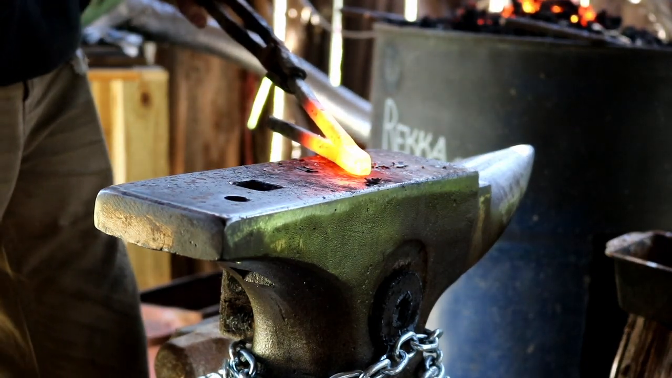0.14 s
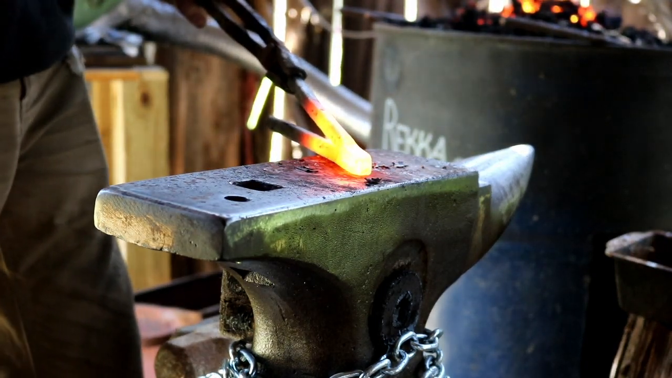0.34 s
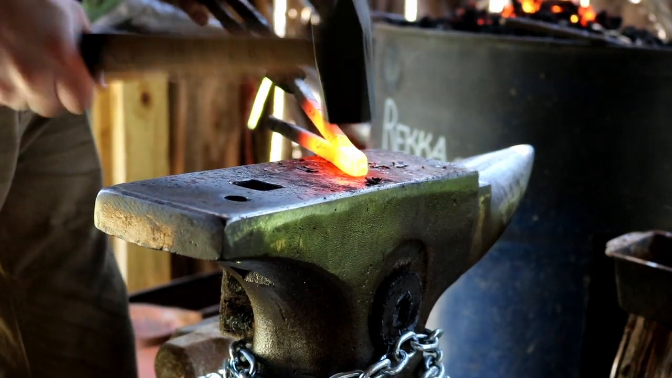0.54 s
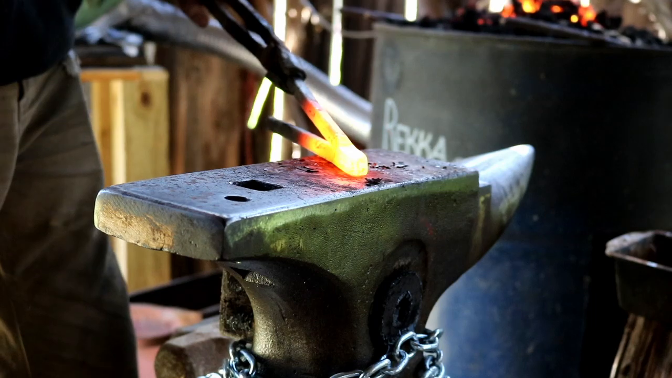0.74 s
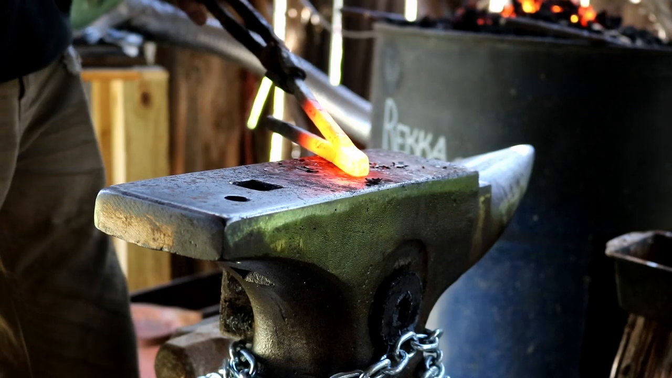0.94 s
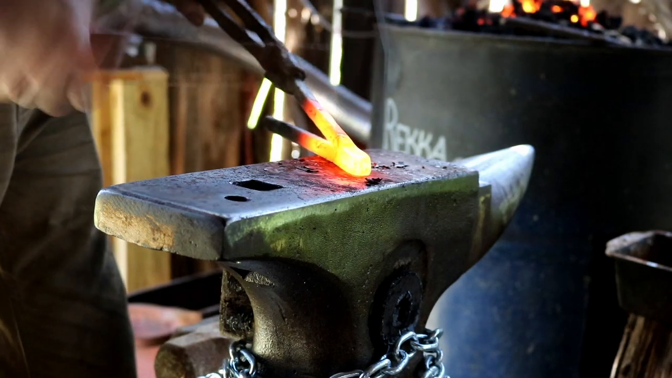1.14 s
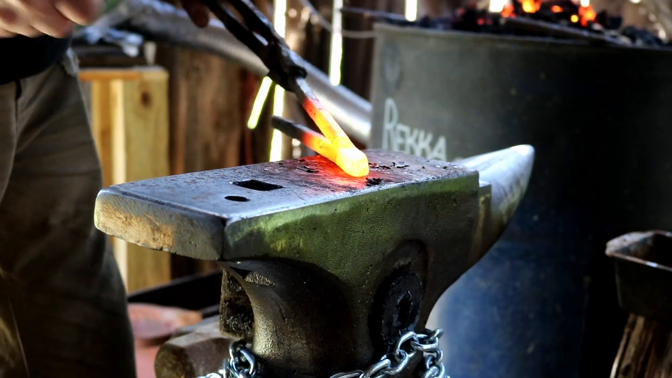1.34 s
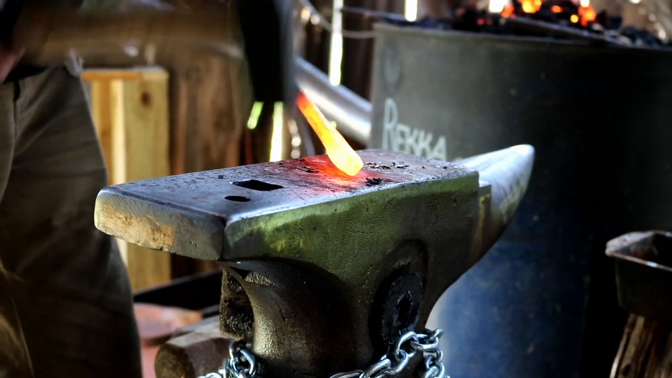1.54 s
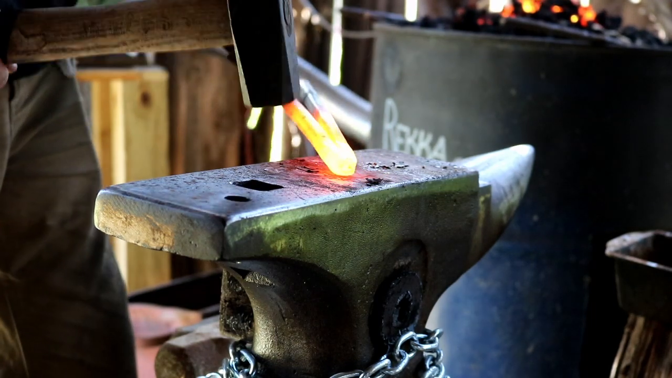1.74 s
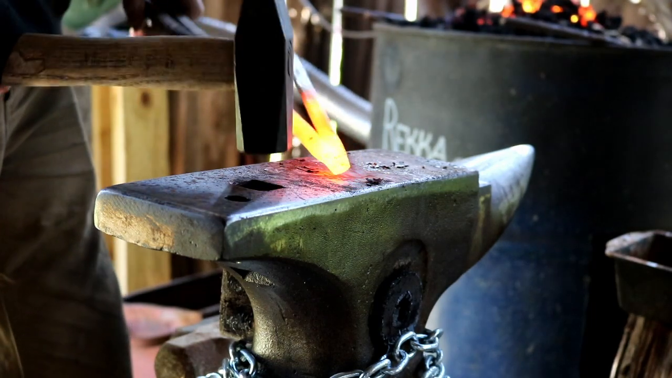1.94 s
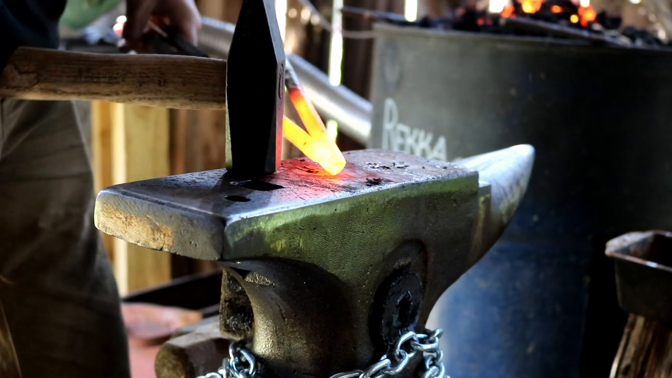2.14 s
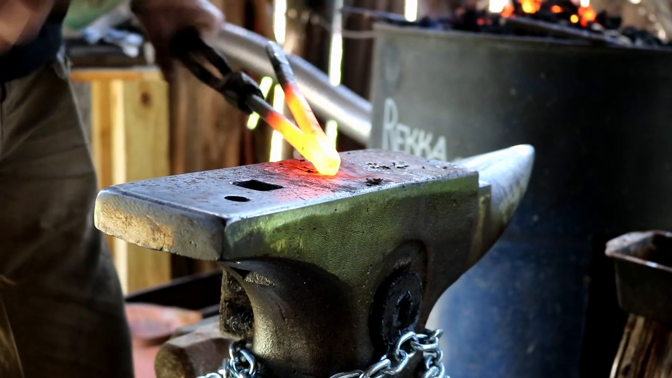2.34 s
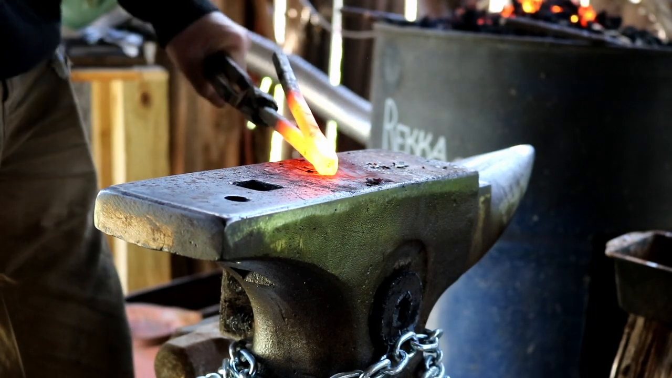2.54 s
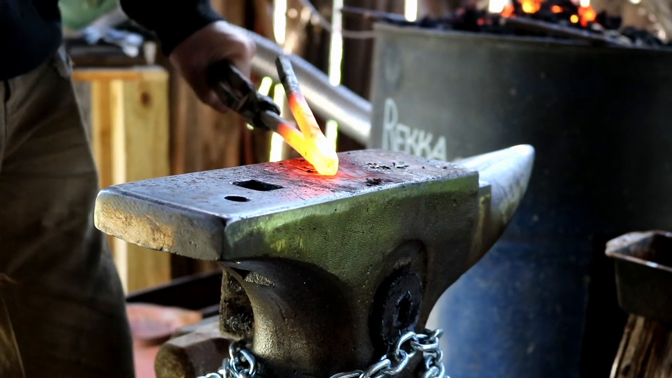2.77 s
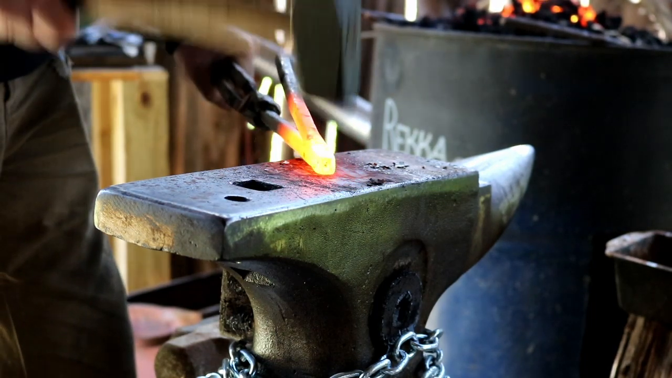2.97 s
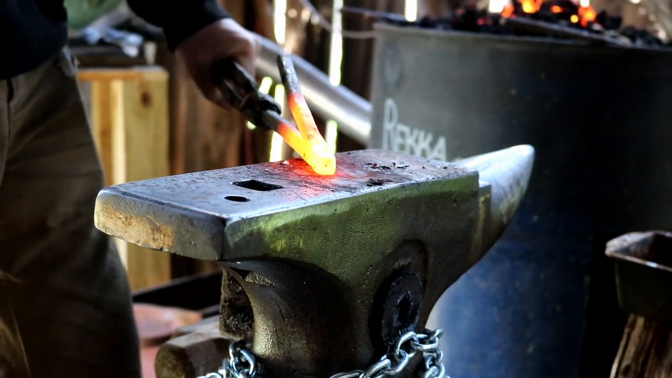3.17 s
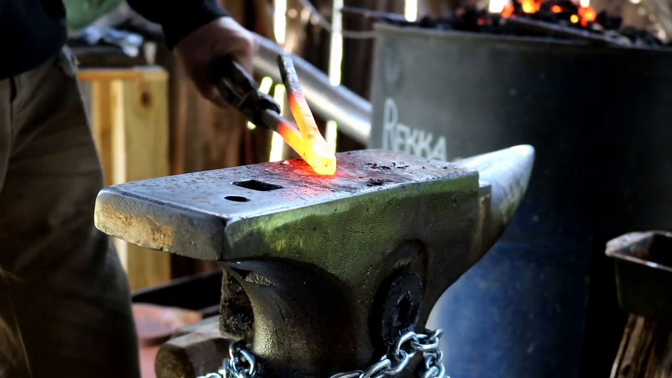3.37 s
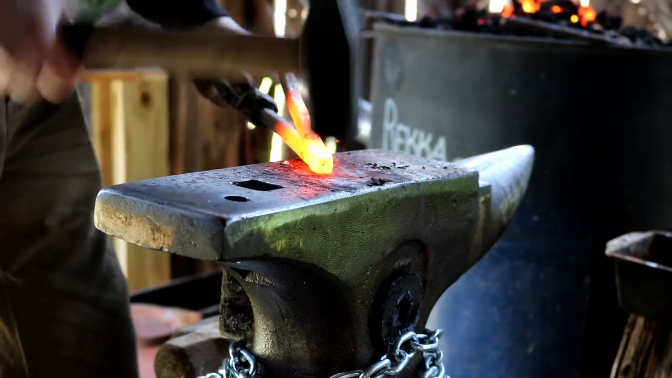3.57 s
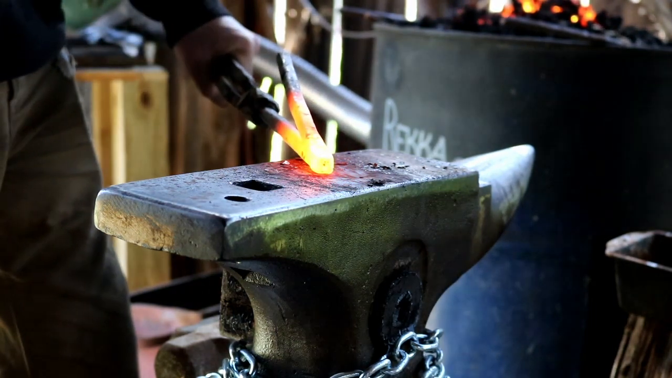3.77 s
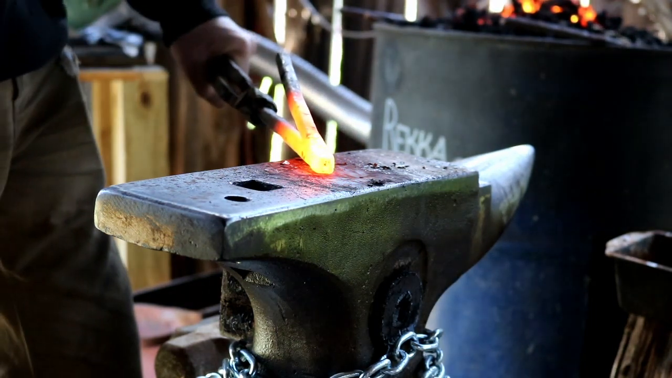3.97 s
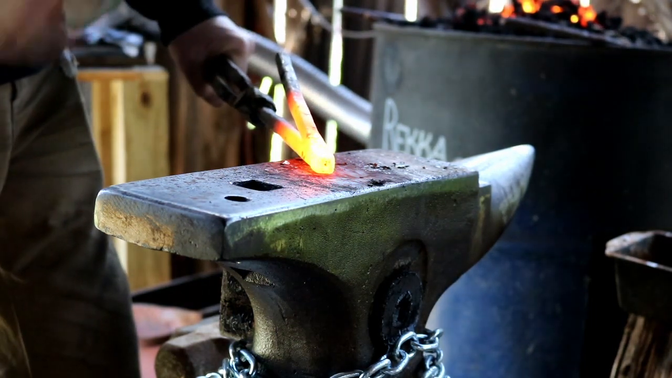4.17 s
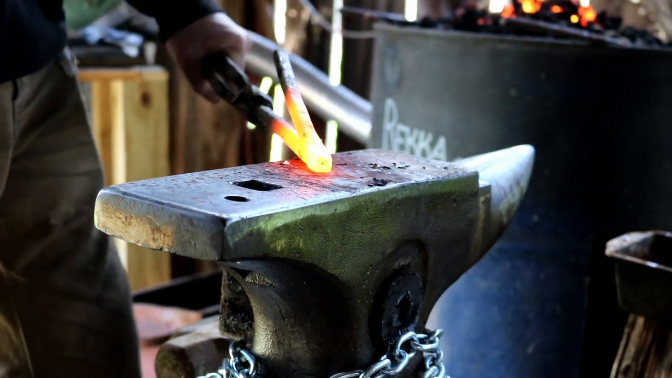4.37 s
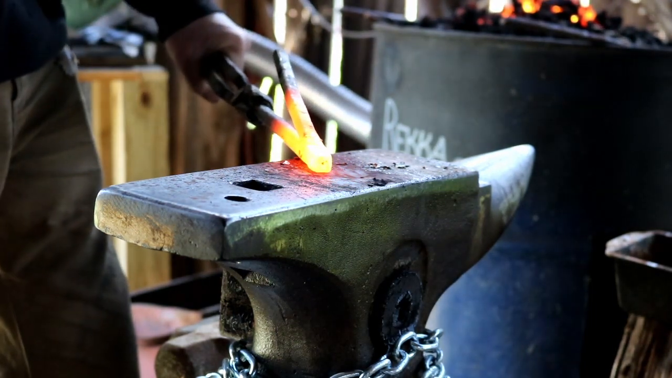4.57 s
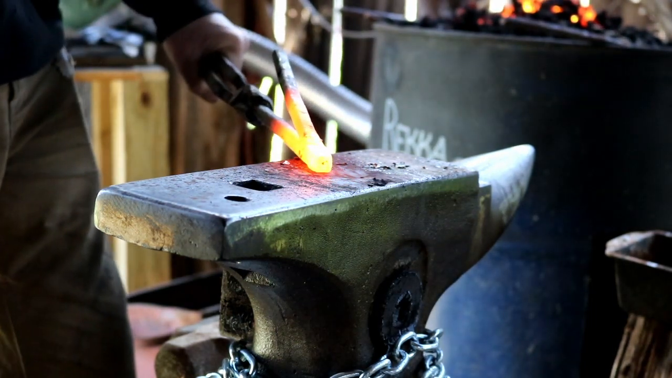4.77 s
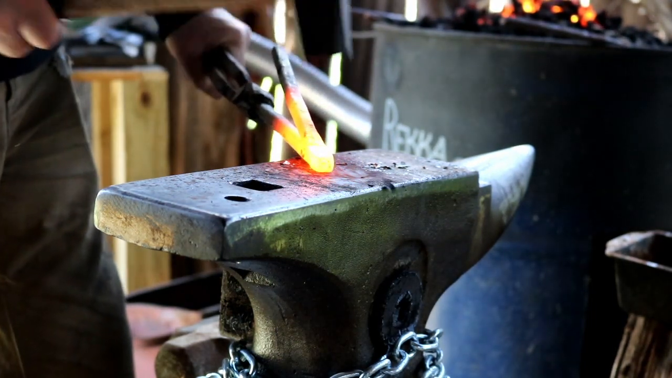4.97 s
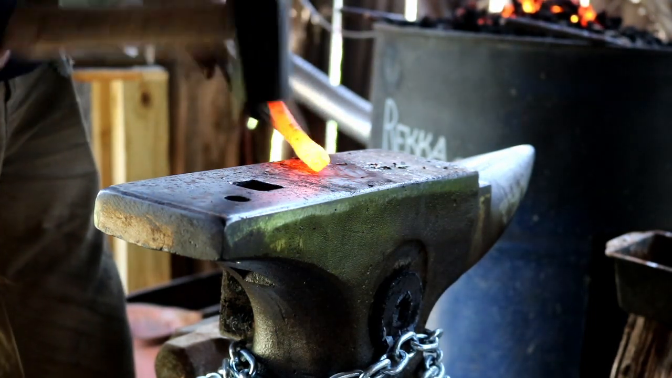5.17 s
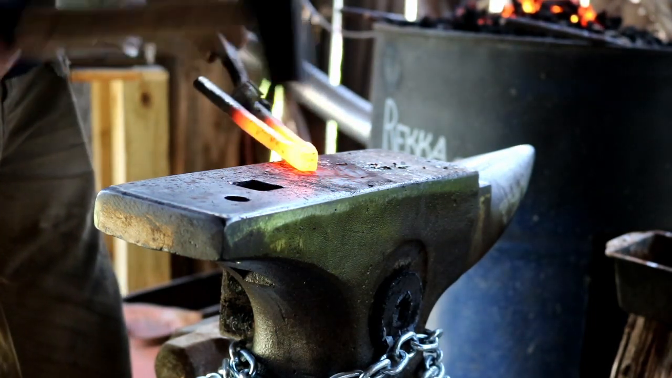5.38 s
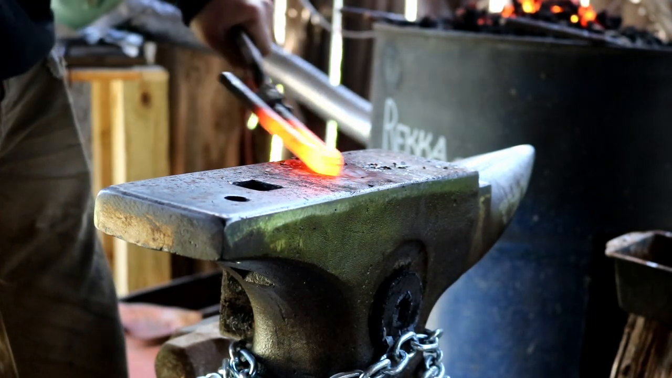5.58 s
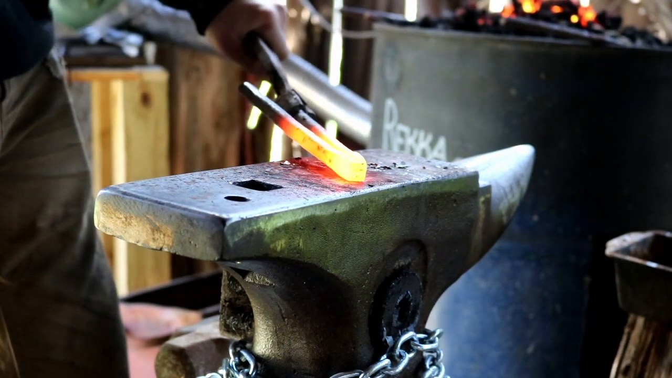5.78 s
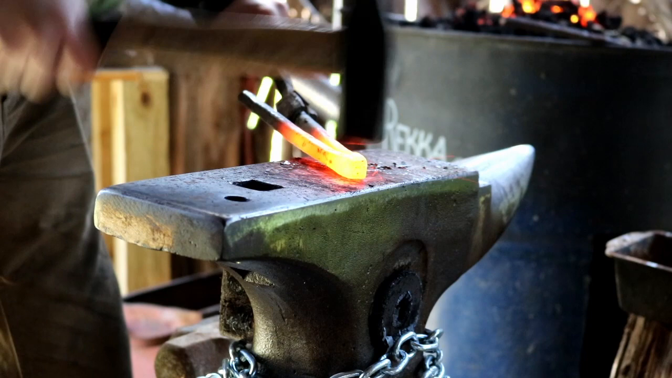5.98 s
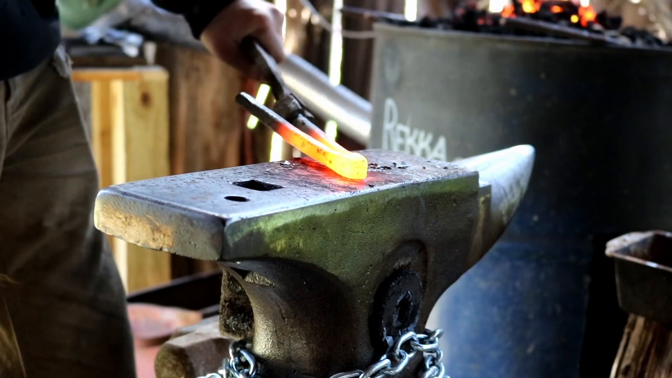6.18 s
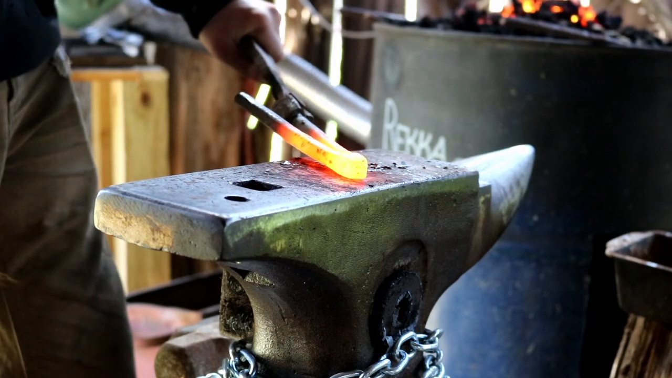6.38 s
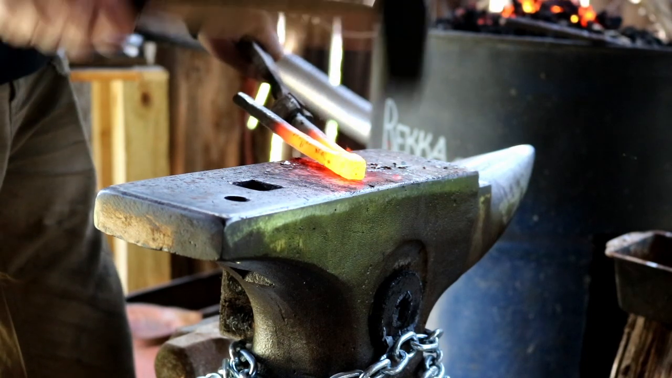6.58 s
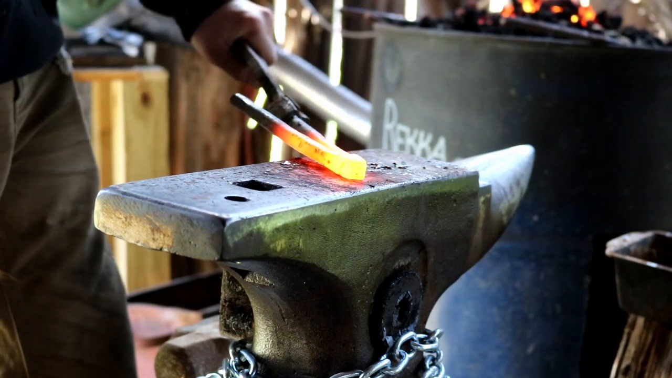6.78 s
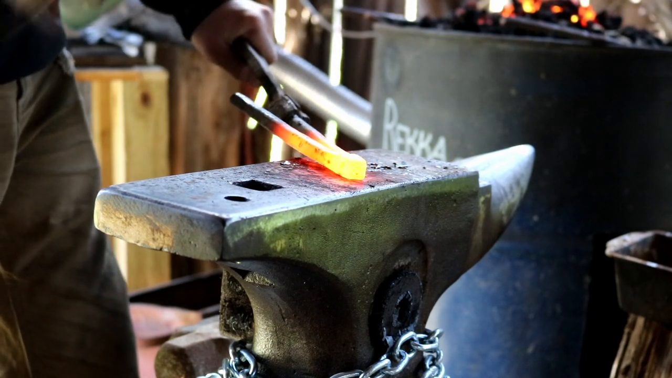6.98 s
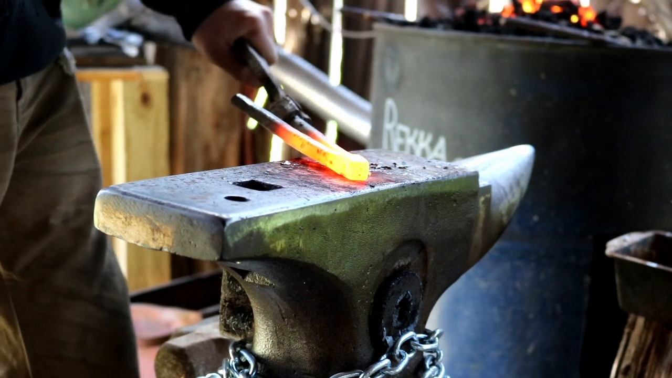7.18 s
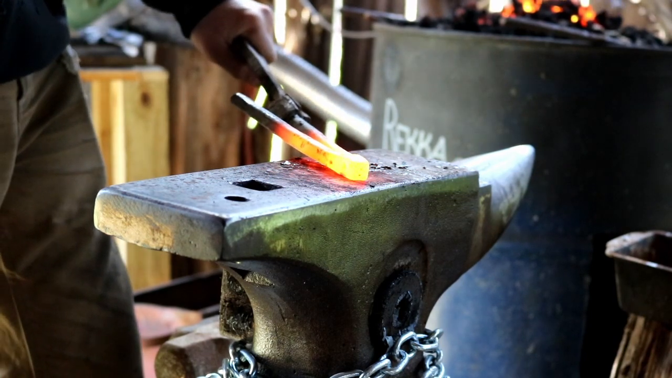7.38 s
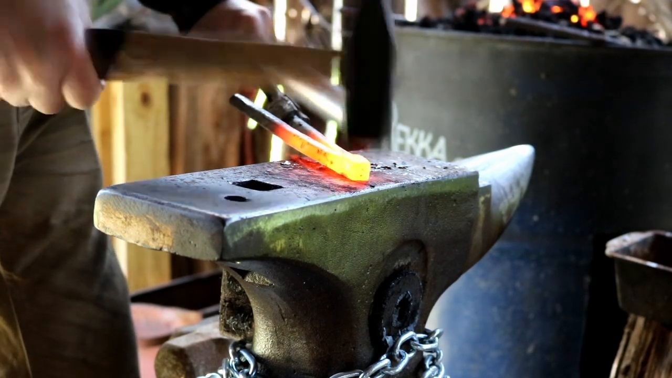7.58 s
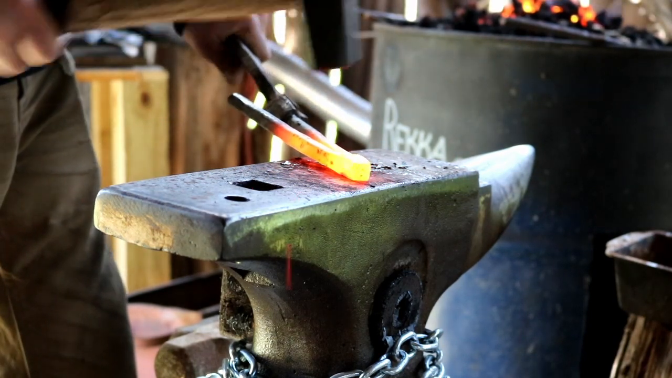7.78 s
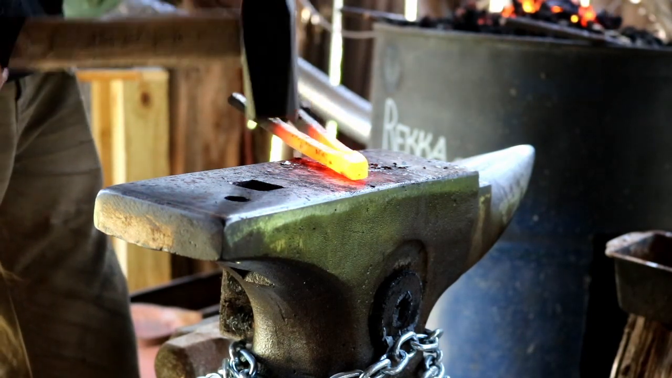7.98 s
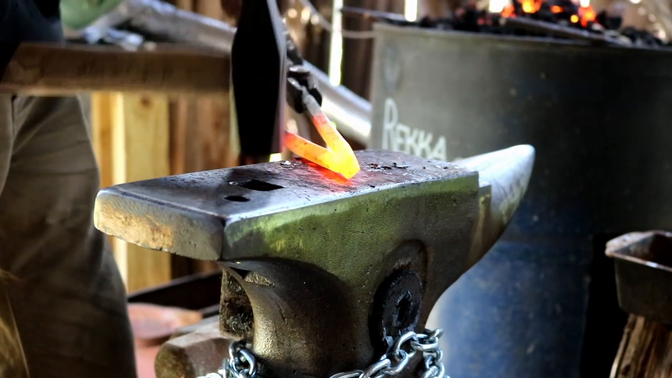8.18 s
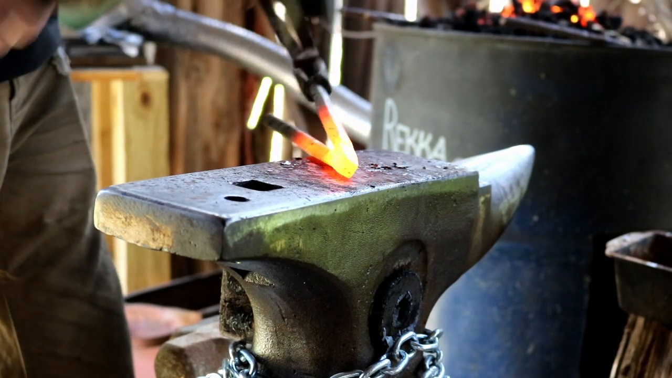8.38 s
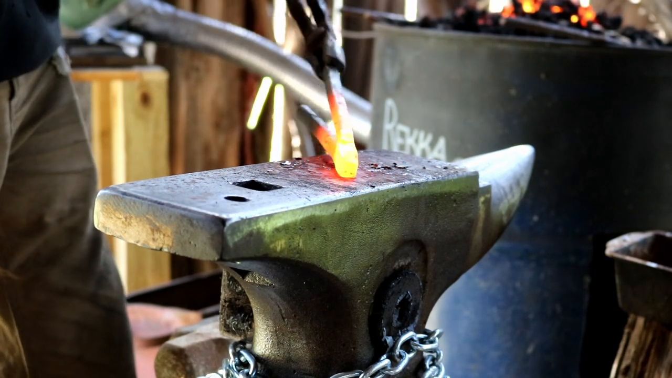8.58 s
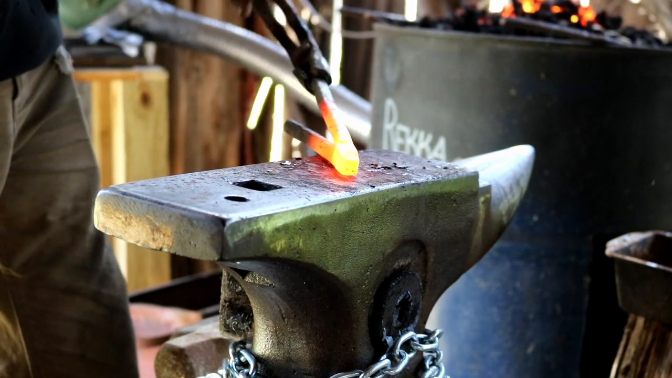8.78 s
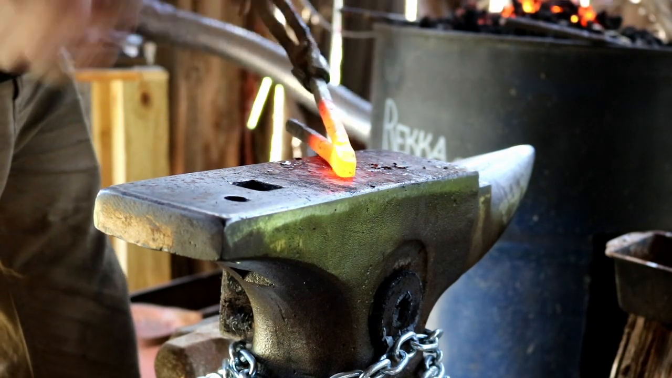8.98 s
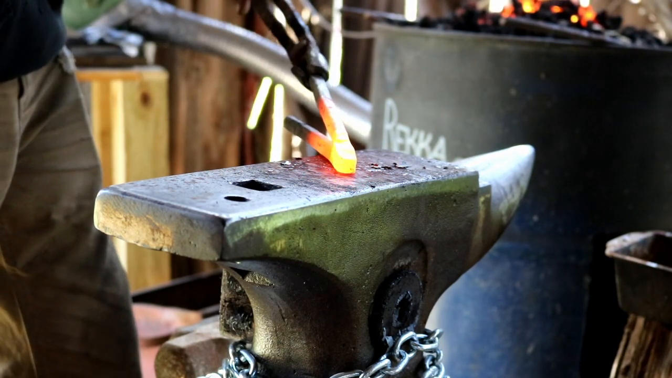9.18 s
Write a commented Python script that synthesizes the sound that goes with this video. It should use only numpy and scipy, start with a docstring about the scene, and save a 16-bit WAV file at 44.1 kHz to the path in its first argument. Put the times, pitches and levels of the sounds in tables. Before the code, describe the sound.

A hand hammer strikes a hot steel bar on an anvil with hard cracking blows, lower clanking taps between them, in a small forge.

```python
"""In a small wooden shop a smith forges a glowing bar on an anvil, close to the microphone and dead centre.
Hard blows on the bar knock and crack (dying modes and noise); hammer drops on the bare face ring lower.
Flakes of scale tick as tiny bursts of bright noise, and the forge murmurs behind as steady shaped noise.
Every stroke and flake has its own random shop echo; the loudest peaks overload the recorder."""
import sys
import numpy as np
from scipy import signal
from scipy.fft import rfft, irfft
from scipy.io import wavfile

SR = 44100
rng = np.random.default_rng(int(sys.argv[2]) if len(sys.argv) > 2 else 0)


def digitize_waveform(pressure):
    """Quantize a signal to 16-bit integers and store it at the path in sys.argv[1].

    Rows of a 2-D input are taken as channels; values are limited to [-1, 1].
    """
    field = np.atleast_2d(pressure).T
    bounded = np.clip(field, -1, 1)
    quanta = np.round(bounded * 32767).astype(np.int16)
    wavfile.write(sys.argv[1], SR, quanta)


N = 406602

# blows on the hot bar: (time [s], force [dB], contact hardness [0-1], hammer tilt [0-1],
# spot from the heel [cm], anvil ring offset [dB])
BLOWS = [ (-.065, 1.5, 0.97, 0.4, 25, 5.5), (0.5973, 1, 0.13, 0.26, 36.4, 2.5),
         (1.2303, 0.5, 0.79, 0.06, 25.5, 2), (2.9558, 1.5, 0, 0.36, 36.5, -7.5),
         (3.626, 1, 0.33, 0.2, 29.8, 6.5), (4.2856, 1.5, 0.67, 1, 34, -2),
         (4.925, 1, 0.71, 0.38, 34.7, 4.5), (5.9965, 1, 0.56, 0.36, 27.9, -3.5),
         (6.5694, 1.5, .55, 0.3, 29.8, -2.5), (7.1064, -2, 0.87, 0.52, 39, -5),
         (7.6536, -1, 0.95, 0.08, 38.3, -1), (9.0793, 1.5, 0.44, 0.12, 35, -.5)]
# the hammer dropped on the bare face: (time [s], force [dB], brightness [dB per octave])
TAPS = [ (1.668, -0.5, -1), (1.9327, -2, -3), (2.1017, -9.5, -6), (2.1673, -15.5, -5), (5.3285, -3.5, -3),
        (7.9848, -0.5, 8.5), (8.2475, -1, 6)]
# scale cracking off the bar: (time [s], dry peak [dB], centre [Hz], decay constant [s])
FLAKES = [(0.215, -41, 12000, .002), (0.2205, -31, 14400, .0015), (0.2375, -23.5, 12600, 0.00064),
          (0.346, -40, 9700, 0.0026), (0.359, -39, 9400, 0.0025), (3.245, -31, 11400, 0.0053),
          (5.2116, -29, 10000, 0.0013), (5.216, -46, 9500, 0.0044), (6.891, -44, 10430, 0.0037)]
# anvil modes before the offsets of each stroke, some in close pairs that beat:
# (frequency [Hz], t60 [s], level through the bar [dB], level struck bare [dB])
ANVIL_MODES = [ (1030, .15, -42, -39), (1112, .16, -36, -36), (1150, .15, -38, -35), (1970, .25, -30, -34),
               (2334, .105, -31, -20), (2500, .11, -33, -25), (3345, .14, -41, -35), (3572, .15, -36, -23),
               (4122, .14, -33, -21), (4168, .14, -35, -23.5), (4605, .14, -39, -21.5),
               (4645, .13, -43, -26), (5150, .13, -44, -29), (5636, .18, -39, -46), (6013, .095, -35, -17),
               (6760, .16, -34, -31), (7439, .16, -39, -47), (8185, .12, -22, -29), (8240, .12, -23, -33),
               (8597, .16, -36, -50), (9230, .15, -42, -42), (9997, .14, -23.5, -32),
               (10782, .28, -30.5, -45), (12047, .3, -39.5, -49), (13027, .35, -44, -63),
               (13463, .2, -54, -64), (13689, .27, -53, -68), (14874, .2, -49, -66), (15472, .35, -46, -59)]
# the hammer head, damped by its handle: (frequency [Hz], t60 [s])
HAMMER_MODES = [(10285, .02), (12745, .024)]
# bar and tongs driven against the face: (frequency [Hz], t60 [s], relative level [dB])
KNOCK_MODES = [(683, 0.018, -21), (982, 0.047, -16.5), (1570, 0.0094, -21), (1828.5, 0.019, -7),
               (2270, 0.01, -17)]
# the anvil jolting its wooden stand: (frequency [Hz], t60 [s], relative level [dB])
STAND_MODES = [(61, 0.49, -55.5), (155, 0.083, -40.5), (212, 0.098, -42.5), (348, 0.06, -36.5)]
# contact noise on the bar and on the bare face: (frequency [Hz], relative spectrum level [dB])
BAR_CRACK = [(40, -3.5), (400, 6), (800, 11.5), (1400, 17.5), (2400, 19), (3000, 14.5), (4500, 12.5),
             (7500, 15.5), (10500, 18.5), (12500, 9), (16000, 3.5)]
FACE_CRACK = [(40, -20), (200, 9.5), (450, 3.5), (1400, 14), (2000, 16.5), (3000, 14), (4500, 17),
              (7500, 3), (10500, 5), (13000, -11.5), (16000, -24.5)]
# echo level before each source's own echo setting: (frequency [Hz], level re direct [dB])
SHOP_GAIN = [(60, 2.5), (250, -4.5), (1000, -4), (2000, -10), (5000, -5), (8500, -7.5), (10500, -16.5),
             (15000, -27.5)]
# decay of the shop before its swell is applied: (frequency [Hz], t60 [s])
SHOP_T60 = [(60, 0.94), (250, 0.46), (1000, .35), (2500, 0.36), (4200, 0.22), (6000, 0.22), (15000, 0.48)]
# colour of the forge: (frequency [Hz], relative spectrum level [dB])
FORGE_SPECTRUM = [(12, -27), (20, -2.5), (62, 0.5), (93, -3.5), (123, -4), (176, -9), (380, -11),
                  (524, -16), (916, -15.5), (1560, -19.5), (6840, -21), (15000, -22)]
# stereo width of the forge: (frequency [Hz], side re mid [dB])
FORGE_SIDE = [(60, -19), (240, -9.5), (950, -6), (3770, -4), (15000, -2.5)]

AGE = np.arange(int(.6 * SR)) / SR  # seconds since a stroke, flake or echo began

# where the bar yields it knocks; where it resists the hammer head rings instead: (soft [dB], hard [dB])
KNOCK_DB = (0, -4)
HEAD_DB = (-17, 4.5)
# the head's upper mode re its lower one, and its rise when the hammer lands fully on an edge
UPPER_MODE_DB, TILT_GAIN_DB = -16.5, 17
BLOW_STAND_DB, TAP_STAND_DB = 3.5, -3.0
# the anvil's high modes stand as waves along its face, so the spot struck decides which of them ring
HIGH_MODES_HZ = (6500, 8000)  # the influence of the spot fades in over this range
FACE_WAVE_CM, FACE_WAVE_HZ = 20, 10000  # wavelength along the face at this frequency
SPOT_SWING_DB = 6.5
TAP_PIVOT_HZ, TAP_SPAN_HZ = 4035, (2300, 6500)  # brightness tilts modes about the pivot, within the span
TAP_RING_DB, TAP_RING_SHARE = .5, 0.78  # the hammer lying on the face shortens the ring to this share
# levels of the head's two modes at 0 dB force; dB they gain per dB of force
TAP_HEAD_DB, TAP_HEAD_GROWTH = (-6, -15.5), 1.8
# a narrow resonance that the echo stirs up
SHOP_RESONANCE_HZ, SHOP_RESONANCE_WIDTH_HZ, SHOP_RESONANCE_DB = 1125, 90, 1.5
FORGE_DB = -58  # rms of the forge's mid signal
CUTOFF_HZ = 15900


def from_db(db):
    """Decibels to gain."""
    return 10 ** (np.asarray(db) / 20)


def at_hz(points, hz):
    """Read a table on a log-frequency axis."""
    table_hz, value = np.transpose(points)
    return np.interp(np.log(np.maximum(hz, 1)), np.log(table_hz), value)


def dying(t60):
    """Envelope that loses 60 dB in t60."""
    return from_db(-60 * AGE / t60)


def unit_energy(x):
    """Scale to a sum of squares of one."""
    return x / np.sqrt(np.sum(x ** 2))


def butter(sound, order, edges_hz, kind):
    """Butterworth filter of the given kind."""
    return signal.sosfilt(signal.butter(order, edges_hz, kind, fs=SR, output="sos"), sound)


def spectrum_gain(spectrum, size):
    """Gain of a spectrum table at each FFT frequency."""
    hz = np.arange(size // 2 + 1) * SR / size
    return from_db(at_hz(spectrum, hz))


def noise(spectrum, size):
    """Noise shaped by a spectrum table; 0 dB throughout has rms 1."""
    white = rng.standard_normal(size)
    return irfft(rfft(white) * spectrum_gain(spectrum, size), size)


def ring(hz, t60, level_db):
    """Struck modes: dying tones that start at full swing, neighbours in opposite directions."""
    total = np.zeros(len(AGE))
    for k, (f, t, db) in enumerate(zip(hz, t60, level_db)):
        tone = np.cos(2 * np.pi * f * AGE)
        total += (-1) ** k * from_db(db) * dying(t) * tone
    return total


def add(track, s, sound):
    """Mix a sound into the track from time s on, dropping what falls outside it."""
    start = round(s * SR)
    first, last = max(start, 0), min(start + len(sound), N)
    track[first:last] += sound[first - start:last - start]


def shop_echo(early_db=-5.5, early_t60=0.03, build_s=0.0071, fade_s=0.18):
    """Quick reflections off anvil and smith, then a short tail whose decay depends on frequency."""
    edges = np.geomspace(30, 18000, 22)
    # the echo builds up quickly and then falls away ever faster
    swell = (1 - np.exp(-AGE / build_s)) * np.exp(-(AGE / fade_s) ** 4)
    tail = np.zeros(len(AGE))
    for low, high in zip(edges, edges[1:]):
        band = butter(rng.standard_normal(2 * len(AGE)), 2, [low, high], "band")
        settled = band[len(AGE):]  # past the filter's onset
        centre_hz = np.sqrt(low * high)
        share = np.sqrt(2 * (high - low) / SR)  # the band's part of the whole spectrum
        decay = unit_energy(settled * swell * dying(at_hz(SHOP_T60, centre_hz)))
        tail += share * from_db(at_hz(SHOP_GAIN, centre_hz)) * decay
    resonance = signal.iirpeak(SHOP_RESONANCE_HZ, SHOP_RESONANCE_HZ / SHOP_RESONANCE_WIDTH_HZ, fs=SR)
    tail = tail + from_db(SHOP_RESONANCE_DB) * signal.lfilter(*resonance, tail)
    early = unit_energy(rng.standard_normal(len(AGE)) * dying(early_t60) * (AGE > .0015))
    # small surfaces reflect only the short waves
    return tail + from_db(early_db) * butter(early, 2, 1500, "high")


def in_shop(sound, shop, wet_db=0.0):
    """A sound together with its echo."""
    echo = signal.fftconvolve(sound, shop)[:len(AGE)]
    return sound + from_db(wet_db) * echo


def anvil_ring(shop, level_db, ring_share=1, scatter_db=2.5):
    """The load on the face shifts each mode a little from stroke to stroke, in pitch and in level."""
    hz, t60, *_ = np.transpose(ANVIL_MODES)
    shift, strength = rng.standard_normal((2, len(hz)))
    tones = ring(hz * (1 + .001 * shift), t60 * ring_share, level_db + scatter_db * strength)
    return in_shop(tones, shop, wet_db=-1.5)


def crack(shop, spectrum, t60, wet_db):
    """The noise burst of steel meeting steel; its echo, gathered from all round, is evenly coloured."""
    burst = noise(spectrum, len(AGE)) * unit_energy(dying(t60))
    size = 2 * len(AGE)
    echo = irfft(rfft(shop, size) * spectrum_gain(spectrum, size), size)[:len(AGE)]
    return burst + from_db(wet_db) * echo


def blow(shop, force_db, hardness, tilt, spot_cm, ring_db):
    """The soft bar takes the blow with a knock, and mainly the high anvil modes ring."""
    hz, _, level_db, _ = np.transpose(ANVIL_MODES)
    wave_cm = FACE_WAVE_CM * np.sqrt(FACE_WAVE_HZ / hz)
    belly = np.cos(2 * np.pi * spot_cm / (wave_cm / 2))  # 1 on a belly of the mode, -1 on a node
    high = np.interp(hz, HIGH_MODES_HZ, (0, 1))
    anvil = anvil_ring(shop, level_db + ring_db + high * SPOT_SWING_DB * belly)
    knock = from_db(np.interp(hardness, (0, 1), KNOCK_DB)) * ring(*np.transpose(KNOCK_MODES))
    stand = from_db(BLOW_STAND_DB) * ring(*np.transpose(STAND_MODES))
    lower_db = np.interp(hardness, (0, 1), HEAD_DB)
    upper_db = lower_db + UPPER_MODE_DB + TILT_GAIN_DB * tilt
    head = ring(*np.transpose(HAMMER_MODES), (lower_db, upper_db))
    contact = crack(shop, BAR_CRACK, t60=0.014, wet_db=-0.47)
    body = in_shop(knock + stand, shop, wet_db=-1.0)
    return from_db(force_db) * (anvil + contact + body + in_shop(head, shop, wet_db=-5.5))


def forge():
    """Steady low murmur and hiss, the bass nearly alike on both sides and the treble spread wider."""
    side_spectrum = [(hz, db + at_hz(FORGE_SIDE, hz)) for hz, db in FORGE_SPECTRUM]
    mid = noise(FORGE_SPECTRUM, N)
    side = noise(side_spectrum, N)
    left_right = mid + side * [[1], [-1]]
    return from_db(FORGE_DB) * left_right / np.std(mid)


def flake(shop, peak_db, hz, decay_s, width=0.23):
    """Brittle scale splits in a short run of tiny bright snaps."""
    snaps = rng.standard_normal(len(AGE)) ** 3 * np.exp(-AGE / decay_s)  # cubing makes it spiky
    edges = np.clip([hz * (1 - width), hz * (1 + width)], 100, .45 * SR)
    tick = butter(snaps + 1e-18, 2, edges, "band")
    return in_shop(from_db(peak_db) * tick / np.abs(tick).max(), shop, wet_db=-3.0)


def tap(shop, force_db, brightness_db):
    """On the bare face the middle anvil modes clank; the head's ring grows faster than the force."""
    hz, _, _, level_db = np.transpose(ANVIL_MODES)
    octaves = np.log2(np.clip(hz, *TAP_SPAN_HZ) / TAP_PIVOT_HZ)
    anvil = anvil_ring(shop, level_db + TAP_RING_DB + brightness_db * octaves, TAP_RING_SHARE)
    stand = from_db(TAP_STAND_DB) * ring(*np.transpose(STAND_MODES))
    contact = crack(shop, FACE_CRACK, t60=0.095, wet_db=-0.5)
    body = in_shop(stand, shop, wet_db=-3.5)
    head = from_db(TAP_HEAD_GROWTH * force_db) * ring(*np.transpose(HAMMER_MODES), TAP_HEAD_DB)
    return from_db(force_db) * (anvil + contact + body) + in_shop(head, shop, wet_db=-13.5)


def scene():
    """All the anvil work is dead centre over the forge; the smith moves, so each echo differs in detail."""
    work = np.zeros(N)
    for source, table in ((blow, BLOWS), (flake, FLAKES), (tap, TAPS)):
        for s, *settings in table:
            add(work, s, source(shop_echo(), *settings))
    return work + forge()


def record(dry):
    """The recorder clips the loudest peaks flat, then a steep low-pass cuts the top."""
    clipped = np.clip(dry, -.95, .95)
    low_pass = signal.ellip(10, .1, 70, CUTOFF_HZ, fs=SR, output="sos")
    return signal.sosfilt(low_pass, clipped)


dry = scene()
out = record(dry)
digitize_waveform(out)
```